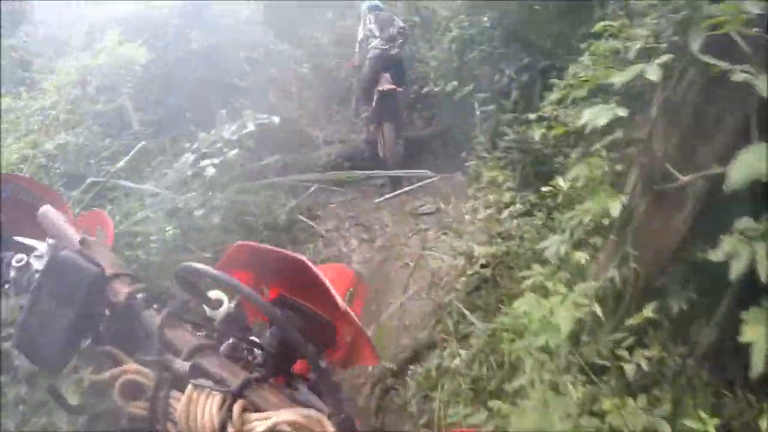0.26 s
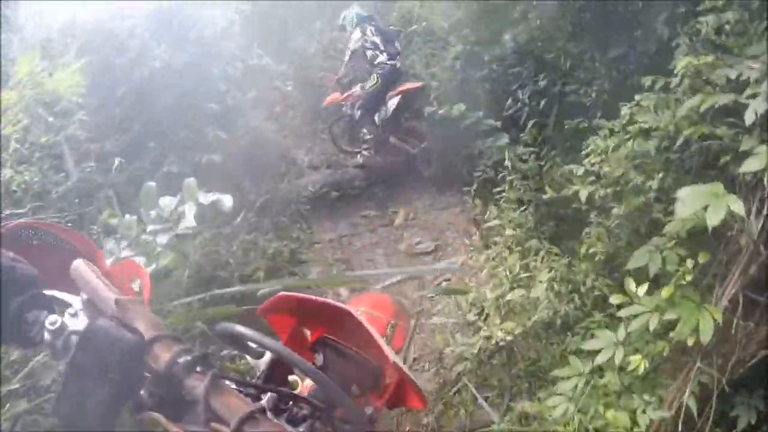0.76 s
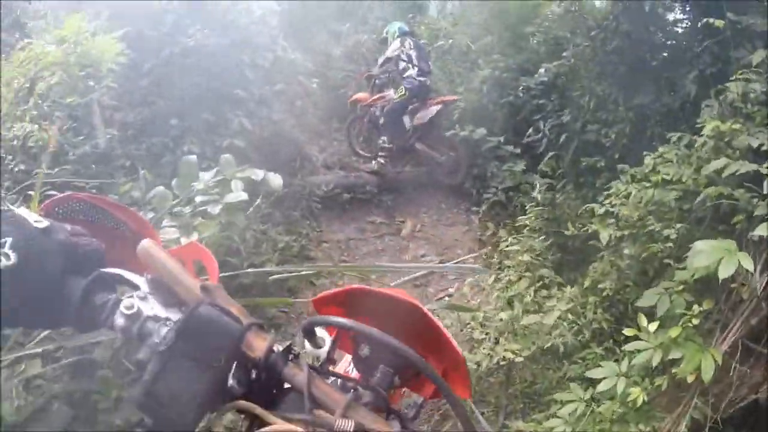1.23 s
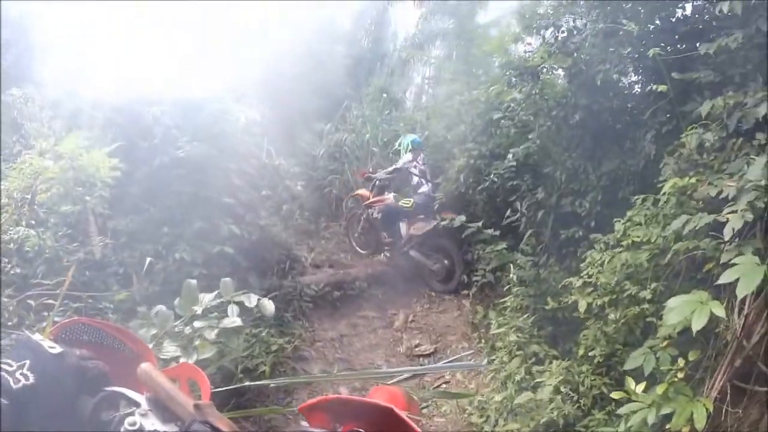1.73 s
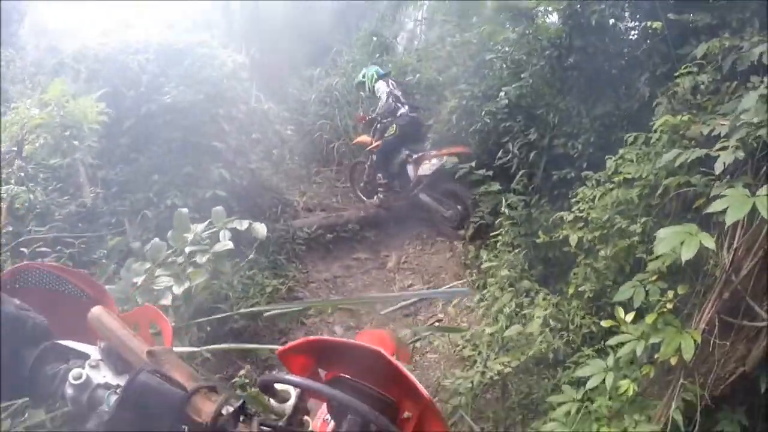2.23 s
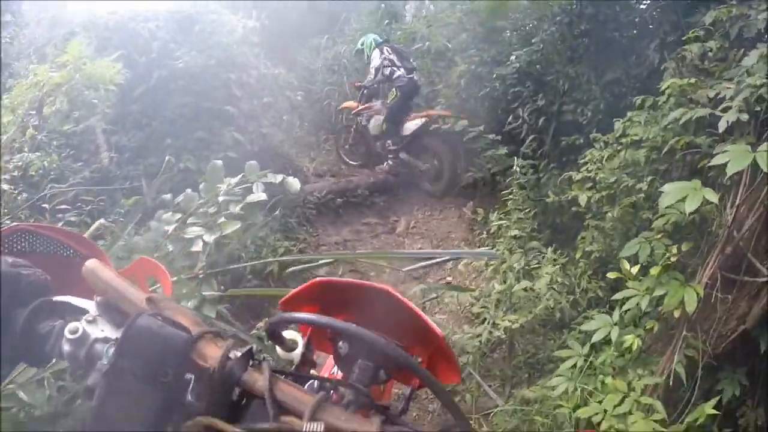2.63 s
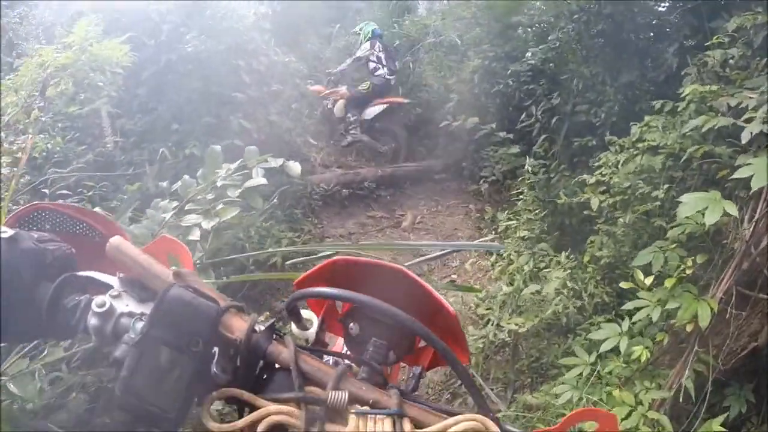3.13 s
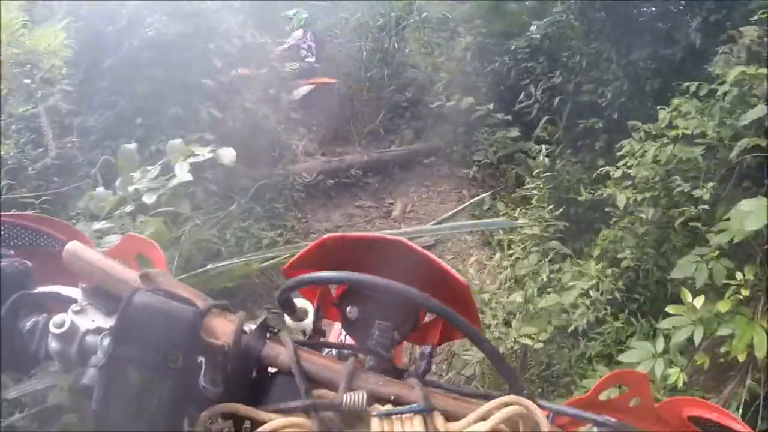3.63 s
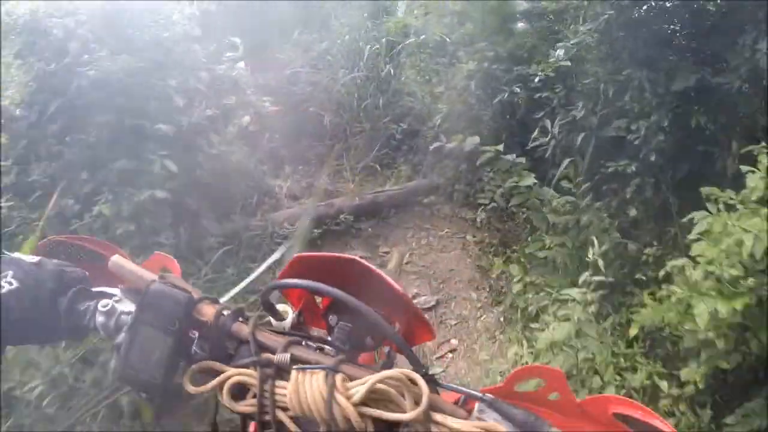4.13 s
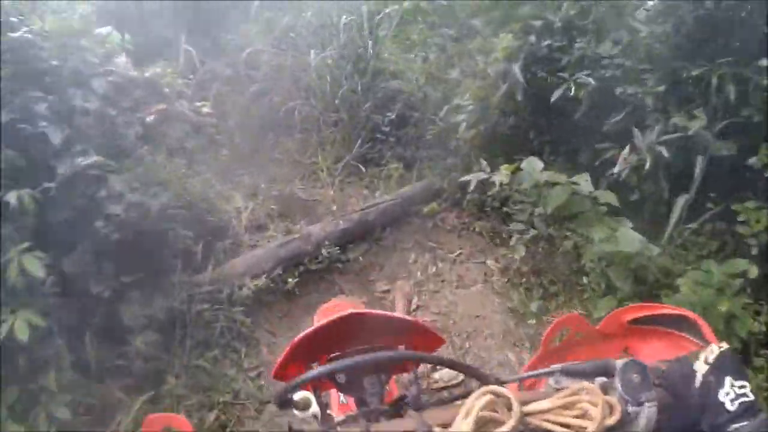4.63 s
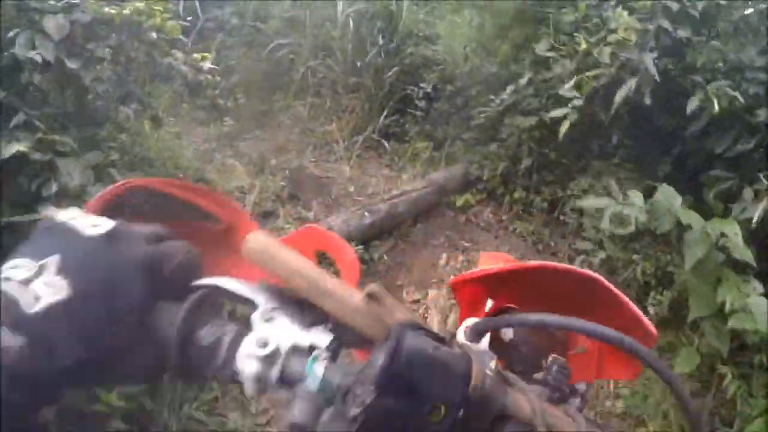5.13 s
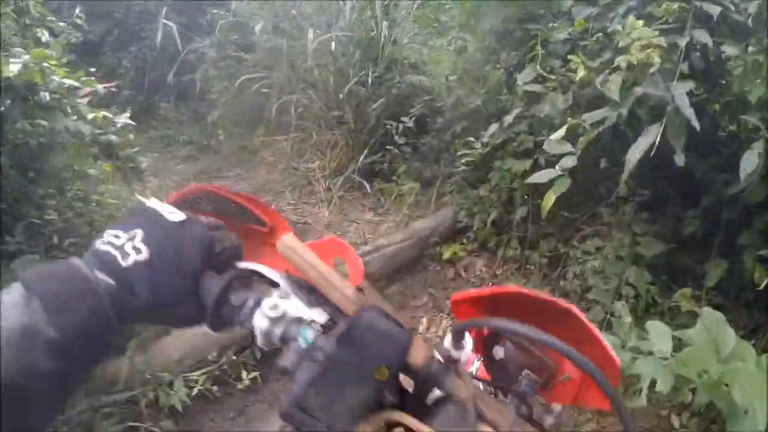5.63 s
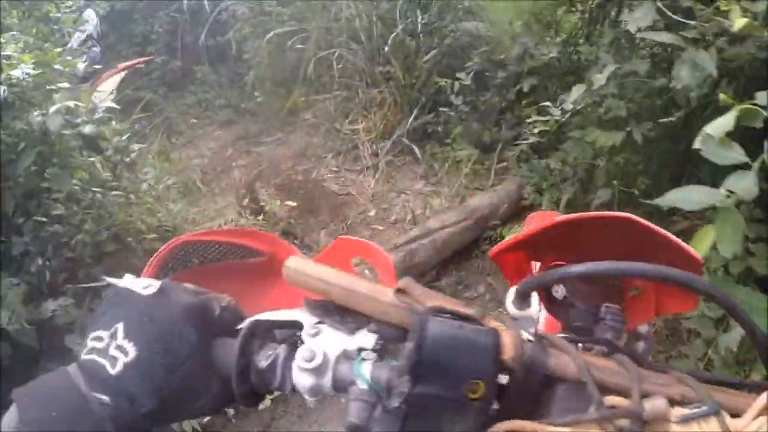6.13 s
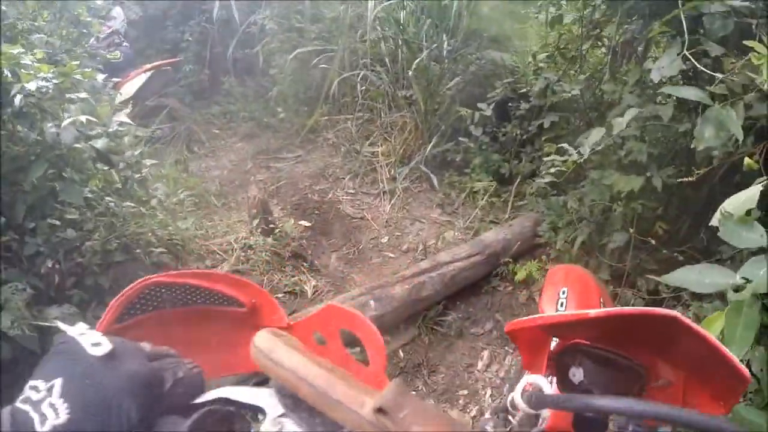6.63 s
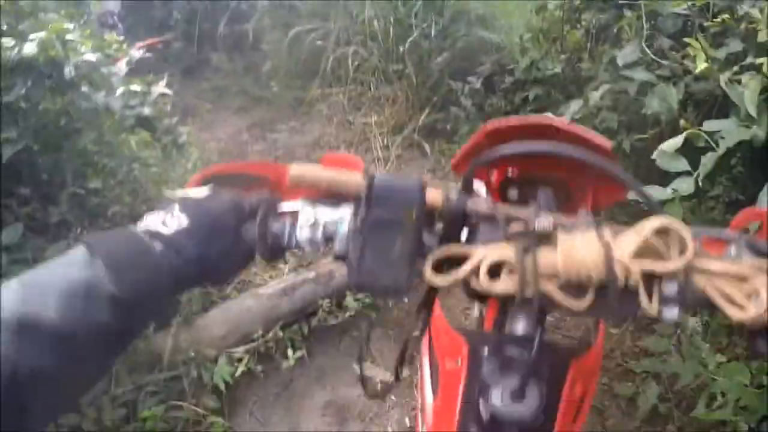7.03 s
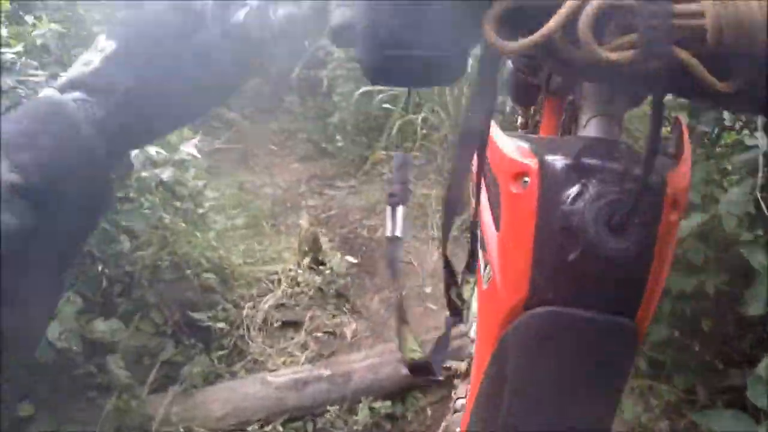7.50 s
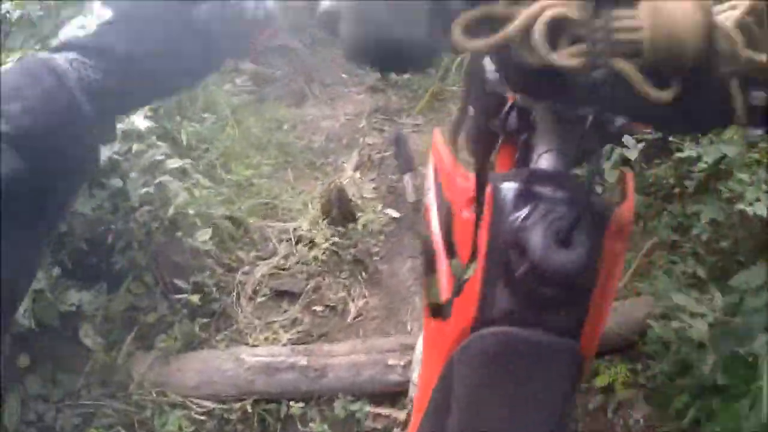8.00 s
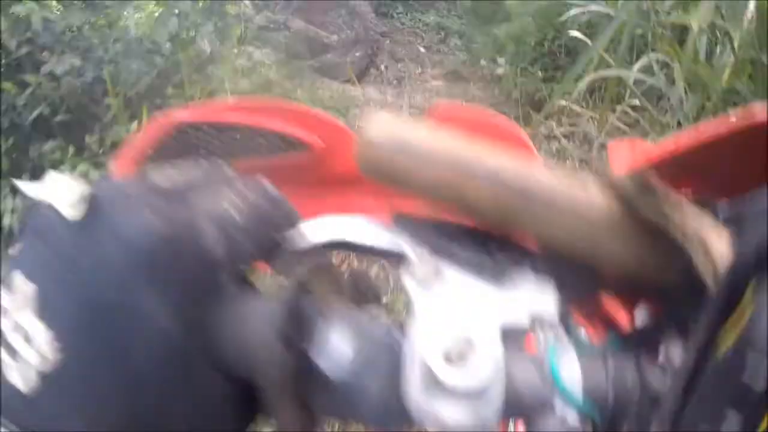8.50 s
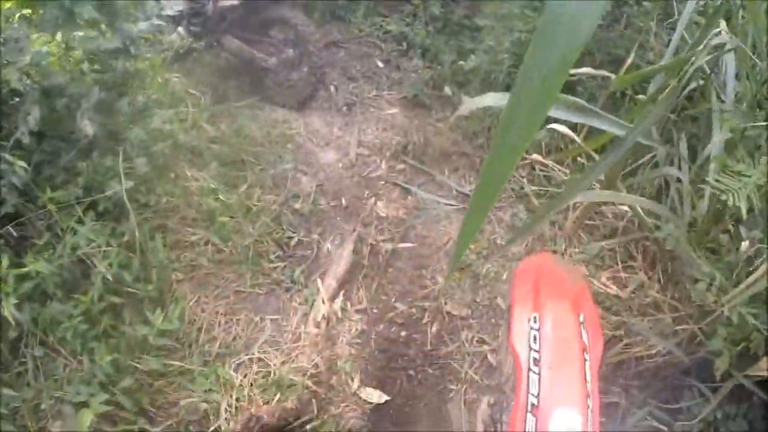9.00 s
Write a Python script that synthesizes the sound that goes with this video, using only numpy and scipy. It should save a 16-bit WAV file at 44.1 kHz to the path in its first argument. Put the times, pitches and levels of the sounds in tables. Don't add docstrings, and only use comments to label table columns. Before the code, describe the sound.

Outdoors among trees, boxy and resonant close sound. An uneven near engine idles and rattles beneath a farther dirt bike's crackling revs and low drone, which recede. Gears begin to whine as the clutch bites, with light clicks, very faint insect chirps and a distant wavering rev. Then the near bike surges roughly, with deep frame thumps, sharp case knocks and low mount shudders, gain dipping at impacts.

```python
import sys
import numpy as np
from scipy import signal
from scipy.fft import rfft, irfft, next_fast_len
from scipy.io import wavfile
from scipy.ndimage import uniform_filter1d

SR = 44100
rng = np.random.default_rng(int(sys.argv[2]) if len(sys.argv) > 2 else 0)


def dump_mix(stems):
    frames = np.atleast_2d(stems).T
    limited = np.clip(frames, -1, 1)
    pcm = np.round(limited * 32767).astype(np.int16)
    wavfile.write(sys.argv[1], SR, pcm)


def attenuation_scalar(level_db):
    decades = np.asarray(level_db, float) / 20
    return 10 ** decades


N = 408366

# (frequency [Hz], width [Hz], level [dB])
CASE_MODES = [(1047, 104, -14.5), (1567, 102, 5), (2280, 234, -5), (2720, 126, 0), (3220, 850, -11),
              (3980, 925, -10.5), (5460, 560, -14.5), (5790, 430, -12.5), (7840, 1300, -22.5),
              (9400, 1440, -24)]
# (frequency [Hz], level [dB])
CASE_LEAK = [(210, -3), (350, 10), (639, -0.5), (1310, -3.5), (1550, -12), (1820, -24), (3120, -3.5),
             (9480, -74), (15500, -71)]

# (start [s], end [s], pitch [Hz], level [dB])
INSECT_CHIRPS = [
    (4.252, 4.325, 13350, -65),
    (5.315, 5.394, 13280, -77.5),
]
# (time [s], pitch [Hz], level [dB])
DISTANT_ORDER = [
    (5.85, 491.8, -58),
    (5.876, 470, -59),
    (6.052, 489, -45.5),
    (6.274, 363.3, -53),
    (6.348, 365.3, -53),
    (6.456, 418, -52),
    (6.618, 272.3, -53),
    (6.796, 422.4, -50),
    (6.95, 436, -58),
]

# (time [s], speed [turns/s])
FAR_CRANK = [(0, 28.29), (.3, 31.02), (.35, 44.77), (.68, 36.53), (.96, 51), (1.2, 56.2), (1.43, 63),
             (1.78, 41.5), (1.83, 35.87), (2.3, 28.11), (2.35, 37.06), (2.86, 44.63), (2.96, 50.5),
             (3.18, 54), (3.5, 41)]
# (start [s], length [s], exhaust crack level [dB])
FAR_OPENINGS = [
    (-.05, 0.16, -45),
    (.3, .12, -31.5),
    (.64, 0.42, -35.5),
    (1.04, 0.39, -37),
    (1.5, 0.33, -52),
    (1.7, 0.087, -51),
    (2.28, 0.33, -32),
    (2.54, 0.39, -27),
    (2.92, 0.23, -37.5),
]
# (time [s], peak [dB])
FAR_POPS = [(0.31, -20), (0.335, -18), (0.358, -15), (0.382, -18), (0.649, -15), (0.6765, -17),
            (0.732, -23), (0.7574, -23), (0.823, -11), (0.8504, -28), (0.9124, -37), (2.2946, -18),
            (2.3246, -20), (2.355, -12.5), (2.383, -11.5), (2.4305, -20), (2.4578, -23), (2.4833, -16),
            (2.562, -21), (2.6374, -28), (2.6863, -17), (2.711, -17), (2.7323, -11), (2.796, -18),
            (2.8435, -17)]
# (frequency [Hz], width [Hz], level [dB])
FAR_DRONE_PEAKS = [(150, 72, -0.5), (354, 111, 1.5)]

# (time [s], peak [dB], frequency [Hz], T60 [s])
MOUNT_JOLTS = [
    (0.502, -21.5, 25.5, 0.82),
    (.90, -23, 26.4, 0.46),
    (4.05, -28.5, 25.8, 1),
    (5.139, -8, 27.2, 0.74),
    (5.70, -20.5, 26.9, 0.87),
    (7.736, 3.5, 35.7, 0.09),
    (7.788, -11.5, 26.66, 1),
    (8.183, -10, 29.53, 0.44),
    (9.2, -5.5, 27.95, .4),
]
# (time [s], thump peak [dB], thump pitch [Hz], crack peak [dB], crack brightness [Hz])
KNOCK_EVENTS = [(3.947, -43, 150, -25, 3530), (3.982, -34, 150, -17.5, 3140), (4.682, -52, 100, -24, 4230),
                (4.725, -37, 90, -34, 4000), (4.746, -44, 100, -24.5, 5300),
                (5.206, -10.5, 257, -0.5, 5200), (7.224, 14, 206, 1, 2390), (7.351, 2, 66, -20, 2000),
                (7.771, -10.5, 194, -2.5, 4470), (7.798, -11, 250, -22.5, 2520),
                (7.889, -5, 116, -21, 2000), (8.021, -8, 79, -22.5, 2000), (8.034, -10, 190, -45.5, 2000),
                (8.43, -12, 276, -17, 1967), (8.530, -9.5, 279, 1, 4520),
                (8.535, -18.5, 286.6, -11.5, 2250), (8.773, 16.5, 187.3, 12.5, 2006),
                (8.885, -36, 198.7, -30, 2020), (9.179, 5.5, 83, -37, 1990)]

# (time [s], speed [turns/s])
NEAR_CRANK = [(0.0, 29.9), (0.88, 19.99), (3.33, 21.33), (3.68, 27.6), (4.35, 22.11), (4.77, 11.67),
              (5.28, 28.78), (5.6, 23.98), (5.77, 33.37), (6.21, 19.64), (6.31, 27.06), (6.81, 16.46),
              (7.09, 40.56), (7.28, 41.24), (7.66, 30.58), (8.11, 28.0), (8.7, 44.68), (9.26, 50.27)]
# (start [s], length [s], exhaust bark level [dB])
NEAR_OPENINGS = [(-.05, 0.051, -43), (.3, 0.29, -39.5), (1.33, 0.27, -42.5), (2.46, 0.51, -36.5),
                 (3.46, 0.55, -36.5), (3.92, 0.67, -37), (5.08, 0.24, -35.5), (5.42, 0.079, -37.5),
                 (5.68, 0.4, -33), (6.27, .24, -34.5), (6.88, 0.11, -34.5), (6.97, 0.26, -27.5),
                 (7.22, .16, -18.5), (7.4, 0.29, -26.5), (7.95, 0.15, -26), (8.15, 0.47, -28),
                 (8.57, 0.34, -23), (8.95, 0.25, -28)]
WEAK_TURNS = [103, 118, 121, 123, 140, 149]
# (frequency [Hz], level [dB], T60 [s])
TAILPIPE_MODES = [(273.8, 17.5, 0.11), (307.2, 11, 0.064), (344, -33, 0.022)]
# (frequency [Hz], width [Hz], level [dB])
CHAMBER_PEAKS = [(66, 35, 1), (108.6, 42, 2), (145.7, 22, -4.5), (276, 39, -3)]
# (time [s], mesh pitch [Hz])
GEAR_MESH = [(3.38, 1930), (3.62, 2300), (4.15, 2162), (4.55, 1646), (5.05, 1886), (5.31, 2682),
             (5.55, 2250), (5.65, 2383), (5.81, 3075), (6.0, 2250), (6.4, 2303), (6.8, 1693), (7.02, 3294),
             (7.13, 3380), (7.28, 3810), (8.1, 2399), (8.5, 3570), (9.26, 4325)]
# (multiple of mesh pitch, level [dB])
MESH_STRANDS = [(1, 1.5), (.84, -14), (1.22, -13), (1.5, -14), (2, -25)]
# (start [s], length [s], whine level [dB])
GEAR_PULLS = [
    (3.46, 0.5, -43.5),
    (4.08, .16, -46),
    (5.11, 0.29, -37.5),
    (5.64, 0.091, -41.5),
    (5.73, 0.17, -36),
    (6.33, 0.095, -48),
    (7.0, 0.1, -35.5),
    (7.15, 0.26, -37),
    (8.1, 0.28, -38),
    (8.35, .32, -37.5),
]

NEAR_START_TURN, FAR_START_TURN = -.374, -1.194
NEAR_IDLE_HZ, FAR_IDLE_HZ = 21, 30
THROTTLE_OPEN_S, THROTTLE_SHUT_S = 0.035, 0.13
NEAR_SHUT_DB, NEAR_SHUT_DB_PER_HZ = -43.5, 0.74
THUD_LAW, RATTLE_LAW = (-39.5, 0.25, 0.18), (-45, 0.42, 0.28)
FAR_SHUT_DB, DRONE_LAW, SCATTER_LAW = -46.5, (-42.5, 0.26, -0.075), (-46.5, 0.27, 0.32)
LEAVES_S, LEAVES_DB_PER_S = 3.02, 17
MOUNT_HZ, MOUNT_WIDTH_HZ, MOUNT_DB, MOUNT_REST_DB = 25.6, 6.1, -38, -47
LUNGE_S, LUNGE_DB = 6.95, -24
THUMP_T60_S = 0.071
CLUTCH_BITES_S = 2.9
REPEAT_FROM_HZ, REPEAT_PER_HZ = 30, .035
BLOCK_S, BLOCK_START_S = 1024 / 48000, .0098
CEILING_DB, RELEASE_DB_PER_S = -0.7, 16.5


def rms_one(x):
    return x / np.sqrt(np.mean(x ** 2) + 1e-20)


def in_time(rows):
    time_s, *columns = np.transpose(rows)
    return [np.interp(np.arange(N) / SR, time_s, column) for column in columns]


def drift(rate_hz, step=1):
    r = np.exp(-80 * np.pi * rate_hz / SR)
    slow = signal.lfilter([1], [1, -2 * r, r * r], rng.standard_normal(N // 40 + 2002))[2000:]
    return np.interp(np.arange(0, N, step) / 40, np.arange(len(slow)), rms_one(slow))


def ring(clicks, hz, t60_s):
    r = attenuation_scalar(-60 / (t60_s * SR))
    w = 2 * np.pi * hz / SR
    return signal.lfilter([0, np.sin(w)], [1, -2 * r * np.cos(w), r * r], clicks + 1e-18)


def band(x, low_hz, high_hz, order=2):
    sos = signal.butter(order, [low_hz, min(high_hz, .45 * SR)], "band", fs=SR, output="sos")
    return signal.sosfilt(sos, x)


def level(x):
    return x / np.sqrt(uniform_filter1d(x ** 2, SR // 4) + 1e-12)


def case(x, wall_db, ring_db):
    size = next_fast_len(N)
    hz = np.maximum(np.arange(size // 2 + 1) * SR / size, 20)
    leak_hz, leak_db = np.transpose(CASE_LEAK)
    shape = attenuation_scalar(wall_db + np.interp(np.log(hz), np.log(leak_hz), leak_db)) + 0j
    for k, (mode_hz, width_hz, db) in enumerate(CASE_MODES):
        peak = 1 / (1 + 1j * (hz ** 2 - mode_hz ** 2) / (hz * width_hz))
        shape += (-1) ** k * attenuation_scalar(db + ring_db * (k == 1)) * peak
    return irfft(rfft(x, size) * shape, size)[:N]


def crank(speed, start_turn):
    hz = uniform_filter1d(in_time(speed)[0], SR // 20, mode="nearest")
    return start_turn + np.cumsum(hz) / SR, hz


def throttle(rows, shut_db):
    t, power = np.arange(0, N, 64) / SR, 0
    for start_s, length_s, db in rows:
        opening = (t - start_s) / THROTTLE_OPEN_S + .5
        shutting = (start_s + length_s - t) / THROTTLE_SHUT_S + .5
        held = np.clip(np.minimum(opening, shutting), 0, 1)
        power = power + held ** 2 * attenuation_scalar(db) ** 2
    return 10 * np.log10(attenuation_scalar(shut_db) ** 2 + np.interp(np.arange(N) / SR, t, power))


def follow(law, above_idle_hz, load_db):
    idle_db, db_per_hz, load_share = law
    return idle_db + db_per_hz * above_idle_hz + load_share * load_db


def firings(turns, lead_s, jitter_s, spread_db, weak=()):
    whole = np.flatnonzero(np.diff(np.floor(turns)) > 0)
    chance = rng.standard_normal((len(whole), 2))
    at = np.clip(whole + (jitter_s * chance[:, 0] - lead_s) * SR, 0, N - 1).astype(int)
    clicks = np.zeros(N)
    clicks[at] = attenuation_scalar(spread_db * chance[:, 1] - 11.0 * np.isin(np.round(turns[whole]), weak))
    return clicks


def puffs(clicks, decay_s, steady, noise=None):
    gate = signal.lfilter([1], [1, -np.exp(-1 / (decay_s * SR))], clicks + 1e-18)
    if noise is None:
        noise = rng.standard_normal(N)
    return noise * (steady + gate)


def orders(turns, peaks, count, load=1):
    step = 6
    turns, load = turns[::step], load[::step]
    speed_hz, out = np.gradient(turns) * SR / step, 0
    for k in range(2, count + 1):
        *low, top = [attenuation_scalar(db) / (1 + (2 * (k * speed_hz - hz) / width_hz) ** 2) for hz, width_hz, db in peaks]
        height = (sum(low) + load * top) * attenuation_scalar(3.0 * drift(3, step))
        out += height * np.sin(2 * np.pi * k * turns + .8 * drift(2, step) - .3 * k)
    return level(signal.resample_poly(out, step, 1)[:N])


def insect():
    t, out = np.arange(N) / SR, np.zeros(N)
    wobble = 2.6 * drift(40)
    for start_s, end_s, hz, db in INSECT_CHIRPS:
        heard = np.clip(np.minimum(t - start_s, end_s - t) / .008, 0, 1)
        out += attenuation_scalar(db) * heard * np.sin(2 * np.pi * hz * t + wobble)
    return out


def distant():
    t, (hz, db) = np.arange(N) / SR, in_time(DISTANT_ORDER)
    phase = 2 * np.pi * np.cumsum(hz) / SR + .6 * drift(6)
    heard = np.clip(np.minimum(t - DISTANT_ORDER[0][0], DISTANT_ORDER[-1][0] - t) / .05, 0, 1)
    return heard * attenuation_scalar(db + 1.0) * (np.sin(phase) + 0.29 * np.sin(1.14 * phase))


def far_scatter(clicks):
    noise = case(puffs(clicks, decay_s=0.0049, steady=0.85), wall_db=-4.5, ring_db=5.5)
    return level(band(noise, 3250, 6800, order=1))


def far_crack(clicks):
    blast = puffs(clicks, decay_s=.003, steady=0.15) + 11.0 * clicks
    crack = level(case(blast, wall_db=1.5, ring_db=11.0))
    crack = band(crack, 900, 6800, order=1)
    ping = level(band(ring(clicks, 1585, 0.022), 1460, 1596))
    return .7 * crack + .75 * ping


def far_pops():
    hard = np.zeros(N)
    hard[[round(s * SR) for s, db in FAR_POPS]] = attenuation_scalar(np.array(FAR_POPS)[:, 1])
    return case(puffs(hard, decay_s=0.0031, steady=0) + 8.1 * hard, wall_db=-14.5, ring_db=-4.0)


def far_bike():
    turns, hz = crank(FAR_CRANK, FAR_START_TURN)
    away_db = -LEAVES_DB_PER_S * np.maximum(np.arange(N) / SR - LEAVES_S, 0)
    load_db = throttle(FAR_OPENINGS, shut_db=FAR_SHUT_DB) - FAR_SHUT_DB
    crack_db = FAR_SHUT_DB + load_db + away_db
    drone_db = follow(DRONE_LAW, hz - FAR_IDLE_HZ, load_db) + .4 * away_db
    scatter_db = follow(SCATTER_LAW, hz - FAR_IDLE_HZ, load_db) + away_db
    clicks = firings(turns, lead_s=.004, jitter_s=.0001, spread_db=1.5)
    drone = orders(turns, FAR_DRONE_PEAKS, count=13, load=attenuation_scalar(2 * np.clip(crack_db + 36, -10, 0)))
    out = attenuation_scalar(scatter_db) * far_scatter(clicks) + attenuation_scalar(crack_db - 2.5) * far_crack(clicks)
    return out + attenuation_scalar(drone_db) * drone + attenuation_scalar(2.5) * far_pops()


def mount(turns, crank_hz):
    loose = rms_one(band(rng.standard_normal(N), 25.0, 32.2))
    detune = 2 * (crank_hz - MOUNT_HZ) / MOUNT_WIDTH_HZ
    shake = attenuation_scalar(MOUNT_REST_DB) + attenuation_scalar(MOUNT_DB + .3 * drift(2)) / (1 + detune ** 2)
    shake += attenuation_scalar(LUNGE_DB) * np.clip((np.arange(N) / SR - LUNGE_S) / 0.161, 0, 1)
    out = shake * attenuation_scalar(-3.0) * (.5 * np.sin(2 * np.pi * turns) + .8 * loose)
    for s, db, hz, t60_s in MOUNT_JOLTS:
        click = np.zeros(N)
        click[round(s * SR)] = -attenuation_scalar(db)
        out += band(ring(click, hz, t60_s), 15.4, 71, order=1)
    return out


def knocks():
    thumps, cracks, span = np.zeros(N), np.zeros(N), SR // 3
    t = np.arange(span) / SR
    for s, thump_db, thump_hz, crack_db, bright_hz in KNOCK_EVENTS:
        at = round(s * SR)
        hiss = rng.standard_normal(span)
        glide = thump_hz * (0.796 * t + 0.0098 * (1 - np.exp(-t / 0.043)))
        thump = attenuation_scalar(thump_db - 60 * t / THUMP_T60_S) * np.sin(2 * np.pi * glide)
        thump -= attenuation_scalar(thump_db - 9.0 - 60 * t / 0.2) * np.sin(2 * np.pi * 68 * t)
        burst = band(hiss * np.exp(-t / 0.0021) * (1 - np.exp(-t / 0.00039)), 1320, bright_hz)
        spark = band(hiss * np.exp(-t / 0.0015), 3900, 23000)
        spark *= attenuation_scalar(crack_db - 20.5) * (bright_hz / 5000) ** 3
        thumps[at:at + span] += (thump + spark)[:N - at]
        cracks[at:at + span] += attenuation_scalar(crack_db) * (burst / np.abs(burst).max())[:N - at]
    return thumps + attenuation_scalar(9.5) * case(cracks, wall_db=-10.0, ring_db=-3.5)


def gears(turns, whine_db, rattle_db):
    hz = uniform_filter1d(in_time(GEAR_MESH)[0], SR // 20)
    surge = 1 + .035 * np.cos(2 * np.pi * turns)
    mesh = 2 * np.pi * np.cumsum(hz * surge) / SR
    whine = sum(attenuation_scalar(db + 3 * drift(60)) * np.sin(k * mesh + .8 * drift(70)) for k, db in MESH_STRANDS)
    rush = rms_one(band(rng.standard_normal(N), 8.6, 550)) * np.sin(.64 * 2 * np.pi * np.cumsum(hz) / SR)
    stroke = turns % 1
    idler = 2 * np.pi * np.cumsum(hz * (1.06 - .12 * stroke)) / SR
    chirps = np.sin(np.pi * stroke) ** 2 * (np.sin(1.3 * idler) + 0.39 * np.sin(1.96 * idler))
    chirps *= attenuation_scalar(2.8 * drift(19))
    sound = attenuation_scalar(rattle_db - 2.5) * (2000 / hz) ** 2 * chirps
    sound += attenuation_scalar(whine_db + 3.2 * np.sin(2 * np.pi * turns)) * whine
    sound += attenuation_scalar(rattle_db + 4.5) * (hz / 4300) ** 4 * rush
    return sound * np.clip((np.arange(N) / SR - CLUTCH_BITES_S) / 0.19, 0, 1)


def contacts(turns, hz):
    same = np.clip((hz - REPEAT_FROM_HZ) * REPEAT_PER_HZ, 0, .6)
    looped = rng.standard_normal(1500)[(turns % 1 * 1500).astype(int)]
    looped = rms_one(band(looped, 1300, 19000))
    return np.sqrt(1 - same) * rng.standard_normal(N) + np.sqrt(same) * looped


def near_rattle(clicks, turns, hz):
    hiss = puffs(clicks, decay_s=0.0045, steady=0.77, noise=contacts(turns, hz)) * attenuation_scalar(1.87 * drift(39))
    return level(case(hiss, wall_db=-11.5, ring_db=-2.5))


def near_thud(turns, hz):
    rumble = rms_one(band(rng.standard_normal(N), 50, 200))
    load = np.clip((hz - 33) / 8, 0, 1)
    return orders(turns, CHAMBER_PEAKS, count=9, load=load) + .35 * rumble


def near_bark(clicks):
    drive = rms_one(clicks) + .12 * rng.standard_normal(N)
    pipe = level(sum(attenuation_scalar(db) * ring(drive, hz, t60_s) for hz, db, t60_s in TAILPIPE_MODES))
    return band(pipe, 200, 390, order=3)


def near_bike(turns, hz):
    above_idle_hz = hz - NEAR_IDLE_HZ
    shut_db = NEAR_SHUT_DB + NEAR_SHUT_DB_PER_HZ * np.minimum(above_idle_hz, 6)
    bark_db = throttle(NEAR_OPENINGS, shut_db=shut_db)
    whine_db = throttle(GEAR_PULLS, shut_db=-61)
    load_db = bark_db - NEAR_SHUT_DB
    thud_db = follow(THUD_LAW, above_idle_hz, load_db)
    rattle_db = follow(RATTLE_LAW, above_idle_hz, load_db)
    clicks = firings(turns, lead_s=.005, jitter_s=.0001, spread_db=1.8, weak=WEAK_TURNS)
    exhaust = attenuation_scalar(bark_db) * near_bark(clicks) + attenuation_scalar(thud_db) * near_thud(turns, hz)
    rattle = attenuation_scalar(rattle_db + 0.5) * near_rattle(clicks, turns, hz)
    return exhaust + rattle + gears(turns, whine_db, rattle_db)


def scene():
    turns, hz = crank(NEAR_CRANK, NEAR_START_TURN)
    background = insect() + distant() + far_bike()
    return (background + mount(turns, hz) + knocks() + near_bike(turns, hz))[None]


def roll_off(x):
    return signal.sosfilt(signal.butter(12, 16340, fs=SR, output="sos"), x)


def record(dry):
    block = ((np.arange(N) / SR - BLOCK_START_S) // BLOCK_S + 1).astype(int)
    block_starts = np.flatnonzero(np.diff(block, prepend=-1))
    peak_db = 20 * np.log10(np.maximum.reduceat(np.abs(dry[0]), block_starts) + 1e-9)
    creep_db = RELEASE_DB_PER_S * BLOCK_S * np.arange(len(peak_db))
    over_db = np.maximum(peak_db - CEILING_DB, 0)
    cut_db = np.maximum.accumulate(over_db + creep_db) - creep_db
    gain = attenuation_scalar(-uniform_filter1d(cut_db[block], size=80))
    top_cut = signal.cheby2(10, 50, 15900, fs=SR, output="sos")
    mix = signal.sosfilt(top_cut, np.clip(dry * gain, -1, 1))
    return roll_off(mix)


dry = scene()
out = record(dry)
dump_mix(out)
```